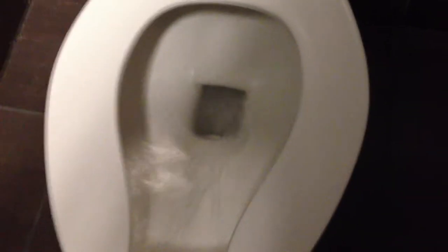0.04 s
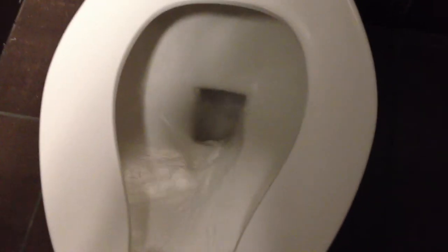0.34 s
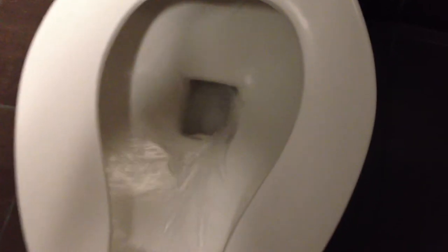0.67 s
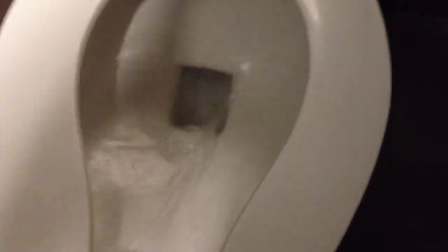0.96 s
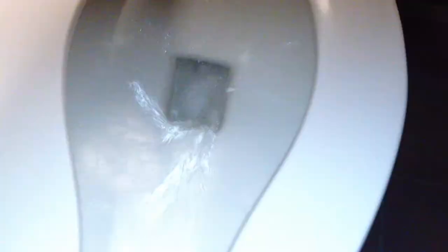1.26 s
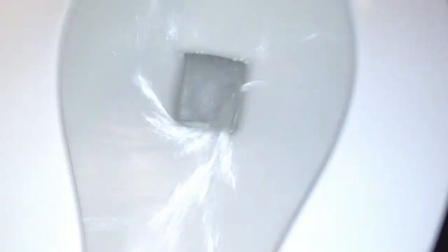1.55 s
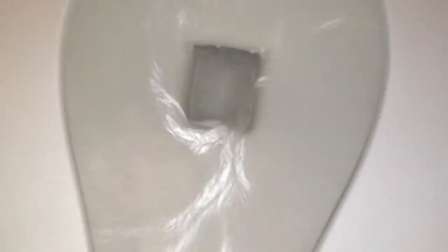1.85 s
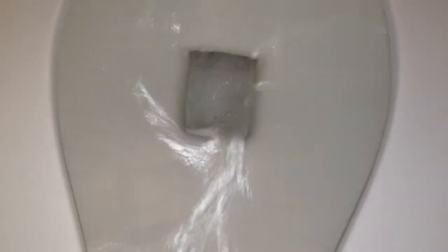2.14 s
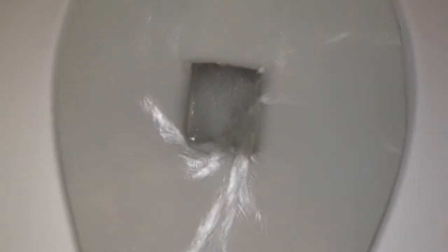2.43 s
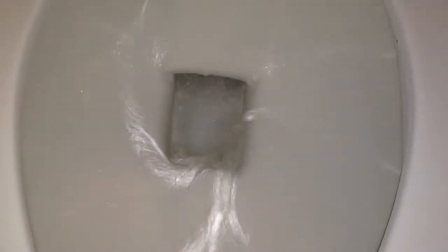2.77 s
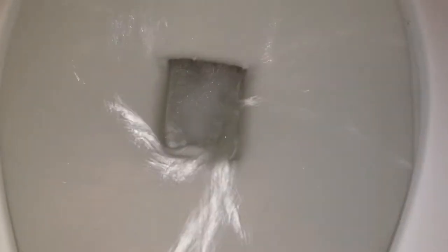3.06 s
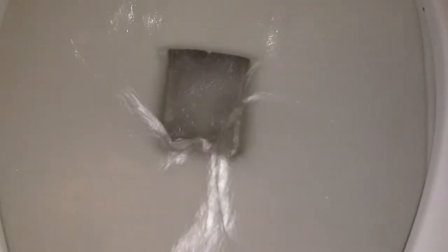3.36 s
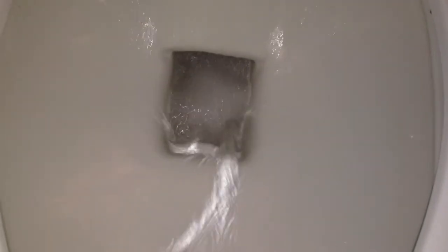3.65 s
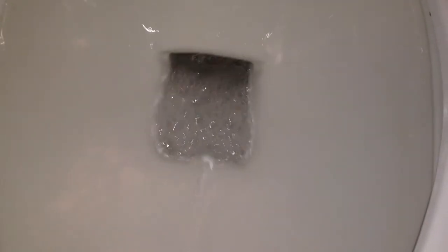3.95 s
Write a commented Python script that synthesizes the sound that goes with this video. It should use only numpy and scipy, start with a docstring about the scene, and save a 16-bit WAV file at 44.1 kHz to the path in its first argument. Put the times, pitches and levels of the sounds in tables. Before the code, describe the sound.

A toilet flushes in a small washroom, heard from above the bowl. Water hisses, splashes and gurgles over the porcelain, then after a sharp slap the flow dies to a trickle and a faint hollow note.

```python
"""A hissing, spattering rush of water: a toilet flushes in a small washroom, heard from above the bowl.
Jets from the rim spray over the porcelain, splash into the pool and churn in the drain, all coloured
by the bowl's hollow. Pockets of air gulp through the stream and slugs of water slap over the drain.
After a last, loud slap the flow dies to a trickle and the drain gives a low hollow note."""
import sys
import numpy as np
from scipy import signal
from scipy.io import wavfile
from scipy.ndimage import uniform_filter1d

SR = 44100
rng = np.random.default_rng(int(sys.argv[2]) if len(sys.argv) > 2 else 0)


def unload_audio(sound):
    """Save the sound as a 16-bit wav file, at the path given as the first command line argument."""
    columns = np.transpose(np.atleast_2d(sound))
    # keep every value between -1 and 1, then stretch to whole-number steps
    steps = np.round(np.clip(columns, -1, 1) * 32767)
    wavfile.write(sys.argv[1], SR, steps.astype(np.int16))


N = 176400
T = np.arange(N) / SR

# Faders of the main stream. Each row: time in seconds, then spray, splash and churn in relative dB.
STREAM_LEVELS = [(0,-25,-28.5,-30),(.13,-22.5,-23.5,-33.5),(.4,-25,-26,-33),(.68,-25.5,-28.5,-34.5),(.78,-28.5,-30.8,-34),(1.17,-29,-30,-38),(1.35,-24,-28.5,-32.5),(1.6,-26.5,-25.5,-32.5),(1.68,-24,-25,-32.5),(1.86,-25,-25,-33),(1.97,-25,-31,-32.5),(2.25,-23.5,-28.3,-33),(2.38,-24,-28,-31.5),(2.5,-28,-28,-35),(2.58,-25,-25,-34),(3.0,-25,-29.5,-31),(3.15,-26,-28,-34),(3.28,-27,-33.5,-37),(3.36,-33.5,-31,-34.5),(3.46,-29,-33.5,-37.5),(3.545,-36.5,-36,-38),(3.59,-42.5,-45,-44),(3.8,-48,-57.5,-44.5),(4,-54.5,-54.5,-50.5)]
# Tone of those three layers. Each row: frequency in Hz, relative level in dB.
SPRAY_SPECTRUM = [(1800,-36),(2700,-15),(3800,-4),(5500,4),(7000,2.5),(9000,1.5),(11500,-3.5),(14000,-2),(16000,-3)]
SPLASH_SPECTRUM = [(450,-41),(750,2.5),(1000,4.5),(1500,-4.5),(2200,-2.5),(2800,10),(4500,-37),(8000,-28)]
CHURN_SPECTRUM = [(30,-43),(55,-23),(85,-33),(115,-18),(160,-43.5),(220,3.5),(330,-3),(600,0.5),(800,-14),(1300,-29)]
# The hollow of the bowl. Each row: centre in Hz, width in Hz, boost or cut in dB.
BOWL_PEAKS = [(276,46,11.5),(964,19.4,6),(1049,76,9.8),(1230,70,-6),(1383,52,11),(1571,90,11.5),(1973,134,8.5),(2237,82,6.5),(4050,860,5),(4820,340,5),(10460,1100,5),(13300,1370,9)]
# The note of the draining pool. Each row: time in seconds, centre in Hz, width in Hz.
POOL_NOTE = [(1.5,596,26.4),(2.4,588,58),(3.5,560,69.5)]
# Faders of the rim jets, mist, coarse drops, pipe rumble and trickle.
# Each row: time in seconds, relative level in dB.
JET_LEVELS = [(0,-37),(1.2,-40),(1.35,-35),(2.2,-32.5),(2.6,-31),(3.15,-29.5),(3.38,-51),(3.48,-32),(3.6,-60)]
MIST_LEVELS = [(0,-36),(2.4,-33.5),(2.65,-30.5),(2.95,-34),(3.1,-24.5),(3.3,-39),(3.6,-65)]
SPATTER_LEVELS = [(0,-28),(.18,-35),(.65,-43.5),(1.15,-49),(1.33,-39.5),(2.35,-32.5),(2.55,-64),(3.25,-37.5),(3.48,-36.5),(3.6,-54)]
RUMBLE_LEVELS = [(0,0.5),(1.2,-10),(1.4,-0.5)]
TRICKLE_LEVELS = [(1.4,-46),(2.3,-42),(3.1,-36),(3.44,-34.5),(3.6,-38.5),(3.76,-39.5),(3.8,-50),(4,-56)]
# Gulps of air. Each row: middle in seconds, length in seconds, pitch in Hz, relative level in dB.
AIR_POCKETS = [(0.042,0.071,2040,-28.5),(0.088,0.27,2995,-34),(0.12,0.17,4300,-31.5),(0.2,0.13,360,-35),(0.312,0.08,4700,-31.5),(.35,0.069,1790,-32.5),(0.684,0.057,970,-33.5),(1.227,0.093,615,-35),(1.312,.025,2080,-37),(1.335,.03,2650,-32),(1.65,0.027,3400,-27.5),(1.677,0.044,3520,-27.5),(1.796,0.031,264,-41),(1.832,0.053,4070,-31),(2.22,0.032,1950,-33.5),(2.278,0.015,2040,-28),(2.342,0.073,1840,-33),(2.402,0.019,3920,-29),(2.457,.022,4100,-32.5),(2.677,.03,1530,-37.5),(3.024,0.018,3570,-31.5),(3.144,.08,2220,-38),(3.182,0.054,485,-32.5),(3.21,0.087,1210,-35.5),(3.253,0.016,4100,-26.5),(3.413,0.041,2030,-36),(3.497,0.16,548,-39.5),(3.637,.035,213,-44.5)]
# Lone drops close by. Each row: start in seconds, relative level in dB.
LONE_DROPS = [(.408,-3.5),(1.675,-16)]
# Slugs of water slapping shut. Each row: start in seconds, decay in seconds, relative level in dB.
SLAP_HITS = [(1.714,.008,-23),(2.394,.009,-19),(2.584,.012,-19.5),(3.324,.0052,-8.5)]
# What the trickle and the slaps ring with. Each row: centre in Hz, width in Hz, relative level in dB.
TRICKLE_RESONANCES = [(206.6,31,-7),(408.6,27,-4),(536.4,29,-3.5),(1067,130,-3.5),(1594,180,-6),(2136,440,0),(4100,1400,-6)]
SLAP_RESONANCES = [(595,160,-6),(4550,900,-1),(6500,2400,-6.5)]


def from_db(db):
    """Decibels to gain."""
    return 10 ** (np.asarray(db) / 20)


def fader(levels, offset_db=0):
    """Gain that glides through rows of seconds and dB, holding its first and last values."""
    return from_db(np.interp(T, *np.transpose(levels)) + offset_db)


def unit_power(x):
    """Scale to an overall power of one."""
    return x / np.sqrt(np.mean(x ** 2) + 1e-20)


def steady(x, window_s=0.095):
    """Ride the gain to unit power over every short stretch; the fast flutter stays."""
    power = np.abs(uniform_filter1d(x ** 2, int(window_s * SR)))
    return x / np.sqrt(power + 1e-20)


def drift(rate_hz):
    """Smooth random wander with a spread of one."""
    step, settle = 40, 2000
    pole = np.exp(-2 * np.pi * rate_hz * step / SR)
    noise = rng.standard_normal(N // step + settle + 2)
    slow = signal.lfilter([1], [1, -2 * pole, pole * pole], noise)[settle:]
    return np.interp(np.arange(N) / step, np.arange(len(slow)), unit_power(slow))


def resonate(x, hz, width_hz):
    """A band-pass resonance with steep skirts."""
    edges = np.clip([hz - width_hz / 2, hz + width_hz / 2], 10, .45 * SR)
    return signal.sosfilt(signal.butter(2, edges, "band", fs=SR, output="sos"), x + 1e-18)


def moving_peak(x, hz, width_hz, db, block=441):
    """A bell boost or cut whose centre and width follow curves, block by block."""
    gain = from_db(db / 2)
    width = np.pi * width_hz / SR * max(gain, 1 / gain)
    tuning = -2 * np.cos(2 * np.pi * hz / SR)
    out, state = np.zeros(N), np.zeros(2)
    for i in range(0, N, block):
        forward = [1 + width[i] * gain, tuning[i], 1 - width[i] * gain]
        feedback = [1 + width[i] / gain, tuning[i], 1 - width[i] / gain]
        out[i:i + block], state = signal.lfilter(forward, feedback, x[i:i + block], zi=state)
    return out


def drops(per_s, spread_db):
    """Random impacts of uneven size: a positive spread makes a few louder, a negative one softer."""
    sizes = from_db(spread_db * np.minimum(rng.exponential(1, N), 5))
    return sizes * rng.choice([-1, 1], N) * (rng.random(N) < per_s / SR)


def rush(spectrum, drops_per_s, spread_db, flicker_db, flicker_hz):
    """Dense impacts blur into a wash of half-octave bands, each flickering on its own."""
    edges = 30 * 2 ** np.arange(0, 9.6, .5)
    hz, db = np.transpose(spectrum)
    impacts = [unit_power(drops(drops_per_s, spread_db)) for _ in range(2)]
    out = 0
    for k, (low, high) in enumerate(zip(edges, edges[1:])):
        band_pass = signal.butter(2, [low, high], "band", fs=SR, output="sos")
        band = signal.sosfilt(band_pass, impacts[k % 2] + 1e-18)
        band_db = np.interp(np.log(np.sqrt(low * high)), np.log(hz), db)
        out = out + band * from_db(band_db + flicker_db * drift(flicker_hz))
    return unit_power(out)


def bubbles(low_hz, high_hz, per_s, cycles, rise, spread_db):
    """Single bubbles ring for some cycles, rising in pitch as they near the surface."""
    out = np.zeros(N + SR)
    for when, pitch, size, life in rng.random((int(per_s * N / SR), 4)):
        hz = low_hz * (high_hz / low_hz) ** pitch
        t60 = cycles * (.5 + life) / hz
        t = np.arange(int(min(t60, .5) * SR)) / SR
        db = spread_db * min(-np.log(1 - size), 3.5) - 60 * t / t60
        start = int(when * N)
        out[start:start + len(t)] += from_db(db) * np.sin(2 * np.pi * hz * t * (1 + rise * t / t60))
    low_cut = signal.butter(2, 0.7 * low_hz, "high", fs=SR, output="sos")
    return unit_power(signal.sosfilt(low_cut, out[:N]))


def bowl(x):
    """The bowl's colour wavers as the water sloshes; the pool's note sinks and widens as it drains."""
    slosh = 1 + 0.0057 * drift(rate_hz=3.5)
    for hz, width_hz, db in BOWL_PEAKS:
        x = moving_peak(x, hz * slosh, width_hz * slosh, db)
    times, hz, width_hz = np.transpose(POOL_NOTE)
    return moving_peak(x, np.interp(T, times, hz) * slosh, np.interp(T, times, width_hz), db=9.5)


def stream():
    """Bright spray, midrange splash and low churn surge together as the jets sputter."""
    surge = drift(rate_hz=26)
    spray = rush(SPRAY_SPECTRUM, drops_per_s=14000, spread_db=3, flicker_db=1.65, flicker_hz=42)
    splash = rush(SPLASH_SPECTRUM, drops_per_s=5000, spread_db=3, flicker_db=2.5, flicker_hz=17)
    splash += from_db(-9) * bubbles(740, 2324, per_s=220, cycles=29, rise=0.12, spread_db=4.5)
    churn = rush(CHURN_SPECTRUM, drops_per_s=3000, spread_db=2, flicker_db=1.5, flicker_hz=12)
    churn += from_db(-12) * bubbles(288.6, 870, per_s=70, cycles=24, rise=0.07, spread_db=1)
    times, *levels = np.transpose(STREAM_LEVELS)
    spray_db, splash_db, churn_db = [np.interp(T, times, db) for db in levels]
    return (steady(bowl(spray)) * from_db(spray_db + 1.5 + 1.2 * surge)
            + steady(bowl(splash)) * from_db(splash_db + 0.68 * surge)
            + steady(bowl(churn)) * from_db(churn_db + 0.49 * surge))


def rim_jets():
    """The rim jets sing in one narrow, sputtering band."""
    hiss = resonate(drops(3000, spread_db=-0.5), hz=4650, width_hz=250)
    sputter = from_db(3.5 * drift(rate_hz=30))
    return steady(hiss * sputter) * fader(JET_LEVELS)


def mist():
    """Fine mist sizzles at the top end, strongest late in the flush as the jets narrow."""
    sizzle = unit_power(resonate(drops(9000, spread_db=5.5), hz=10960, width_hz=1500))
    return sizzle * fader(MIST_LEVELS, 1.1 * drift(rate_hz=33))


def spatter():
    """Coarse drops tick on the porcelain and leave small ringing bubbles."""
    patter = unit_power(resonate(drops(5000, spread_db=2), hz=3620, width_hz=2250))
    pings = bubbles(2636, 4970, per_s=260, cycles=105, rise=0.031, spread_db=5)
    return (patter + pings) * fader(SPATTER_LEVELS, -5 + 0.59 * drift(rate_hz=30))


def pipe_rumble():
    """Water going down the pipe lays a faint rumble under the flush."""
    rumble = unit_power(resonate(rng.standard_normal(N), hz=123.4, width_hz=40))
    return rumble * fader(RUMBLE_LEVELS, offset_db=-60)


def trickle():
    """A thin stream patters and fizzes into the pool, faint at first and swelling near the end."""
    patter = drops(2500, spread_db=3)
    rings = sum(from_db(db) * unit_power(resonate(patter, hz, width_hz))
                for hz, width_hz, db in TRICKLE_RESONANCES)
    fizz = from_db(-9) * bubbles(1190, 6900, per_s=400, cycles=50, rise=.05, spread_db=3.5)
    return (steady(rings) + fizz) * fader(TRICKLE_LEVELS)


def gulps():
    """Each air pocket breaks into a swelling and fading cluster of bubbles of like size."""
    out = np.zeros(N)
    for middle_s, length_s, hz, db in AIR_POCKETS:
        swell = np.exp(-(2 * (T - middle_s) / length_s) ** 2)
        cluster = swell * resonate(drops(per_s=450, spread_db=-1.5), hz, width_hz=.17 * hz)
        makeup_gain = np.sqrt(np.sum(swell ** 2) / (np.sum(cluster ** 2) + 1e-12))
        out += from_db(db) * cluster * makeup_gain
    return out


def hit(start_s, decay_s, db):
    """An envelope with an instant attack and an exponential decay."""
    return from_db(db) * (T > start_s) * np.exp(-np.abs(T - start_s) / decay_s)


def drop_ticks(decay_s=.0009):
    """Lone drops land close by with a sharp tick."""
    envelope = sum(hit(start_s, decay_s, db) for start_s, db in LONE_DROPS)
    bright_noise = unit_power(np.diff(rng.standard_normal(N + 1)))
    return envelope * bright_noise


def slaps():
    """Slugs of water smack shut over the drain, ringing the pool and the porcelain."""
    force = sum(hit(start_s, decay_s, db) for start_s, decay_s, db in SLAP_HITS)
    out = 0
    for hz, width_hz, db in SLAP_RESONANCES:
        noise = resonate(rng.standard_normal(N), hz, width_hz / 2)
        ring = np.cos(np.angle(signal.hilbert(noise)))  # phase only, so the force sets the punch
        out = out + from_db(db) * resonate(force * ring, hz, width_hz)
    return out


def drain_note(start_s=3.86, rise_s=0.092):
    """The emptied drain resounds with a low hollow note."""
    fade_in = np.clip((T - start_s) / rise_s, 0, 1)
    note = steady(resonate(rng.standard_normal(N), hz=256, width_hz=46))
    return from_db(-41.5) * fade_in * note


def washroom(x, t60_s=0.24, predelay_s=.003):
    """Hard walls give a short reverb; four tails crossfade as the listening position sways."""
    t = T[:SR // 2]
    tails = rng.standard_normal((4, len(t))) * from_db(-60 * t / t60_s) * (t > predelay_s)
    shares = np.array([drift(rate_hz=0.41) for _ in tails])
    shares /= np.sqrt(np.sum(shares ** 2, axis=0))
    reverbs = [signal.fftconvolve(x, tail / np.sqrt(np.sum(tail ** 2)))[:N] for tail in tails]
    return np.sum(shares * reverbs, axis=0)


def scene():
    """All the water in its room, over the dry pipe rumble, the same in both channels."""
    water = stream() + rim_jets() + mist() + bowl(gulps() + spatter())
    water = water + slaps() + drop_ticks() + trickle() + drain_note()
    mix = from_db(-1.44) * (water + from_db(-8) * washroom(water)) + pipe_rumble()
    return np.array([mix, mix])


def record(dry, cutoff_hz=15300):
    """A steep high cut takes off the very top."""
    return signal.sosfilt(signal.ellip(12, .1, 85, cutoff_hz, fs=SR, output="sos"), dry)


dry = scene()
out = record(dry)
unload_audio(out)
```